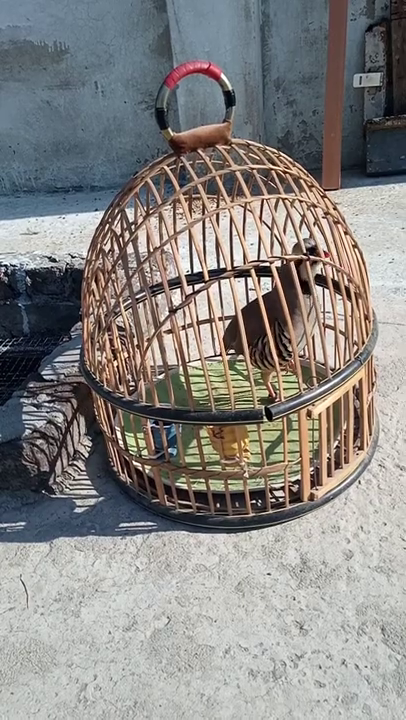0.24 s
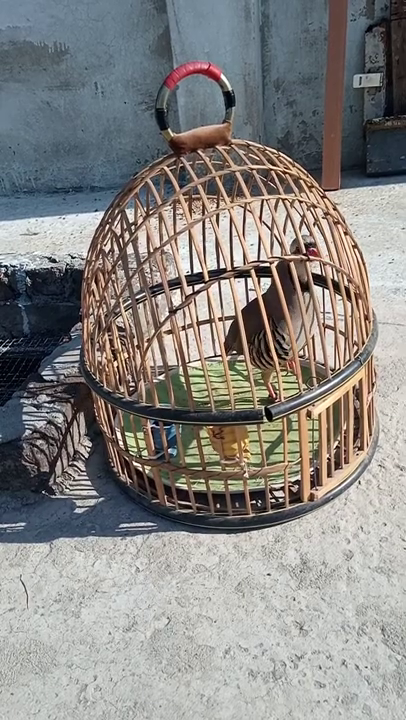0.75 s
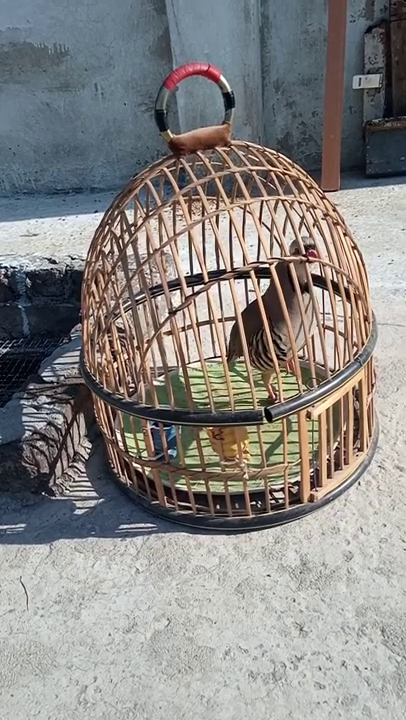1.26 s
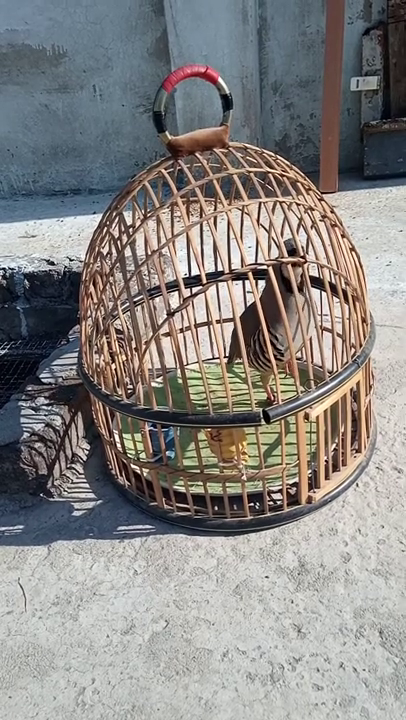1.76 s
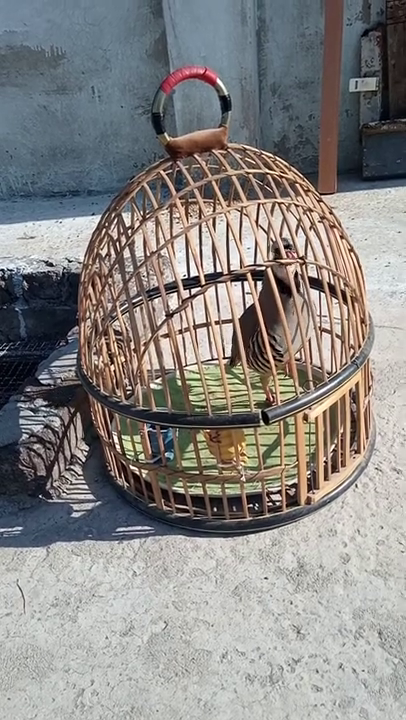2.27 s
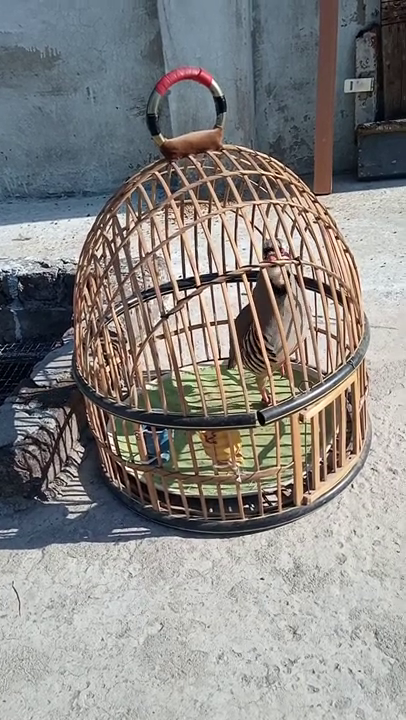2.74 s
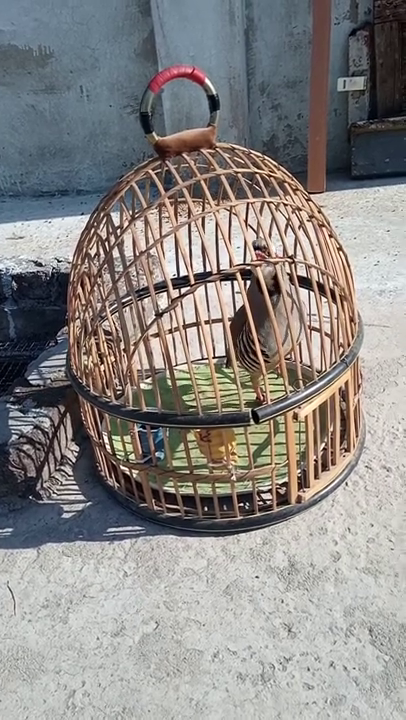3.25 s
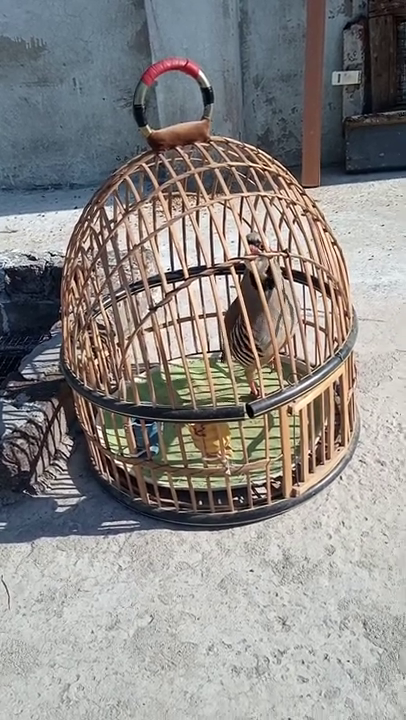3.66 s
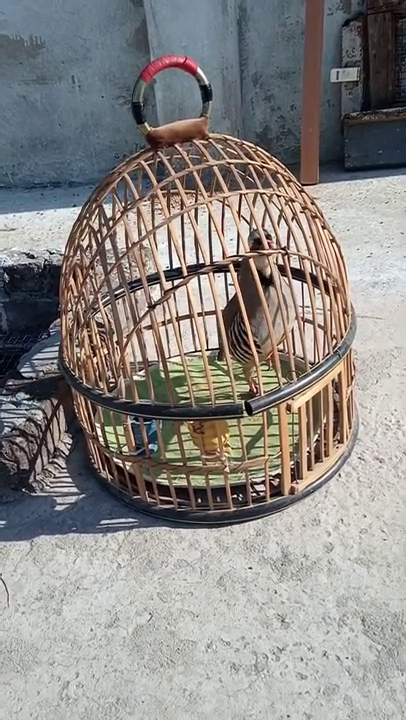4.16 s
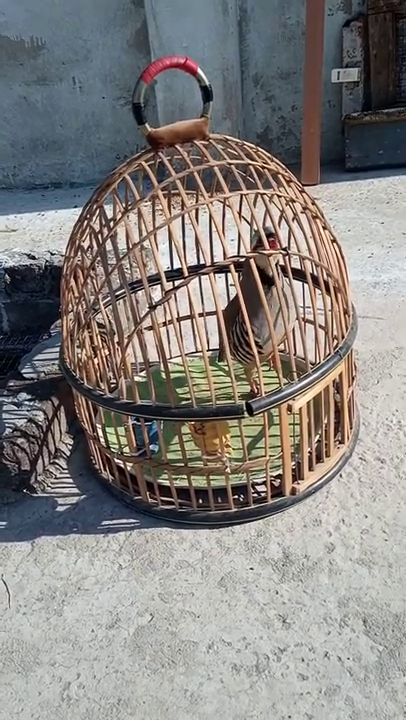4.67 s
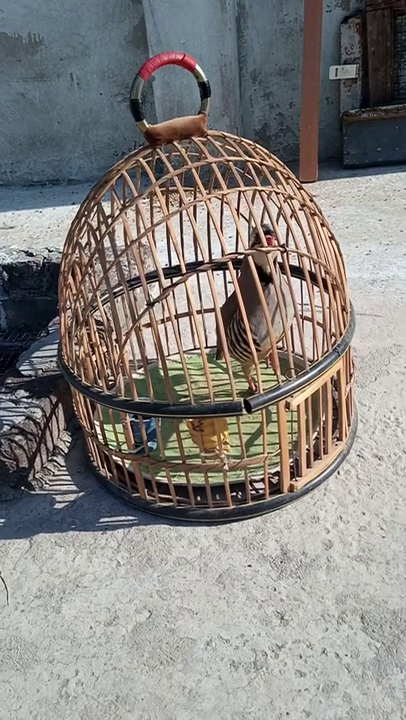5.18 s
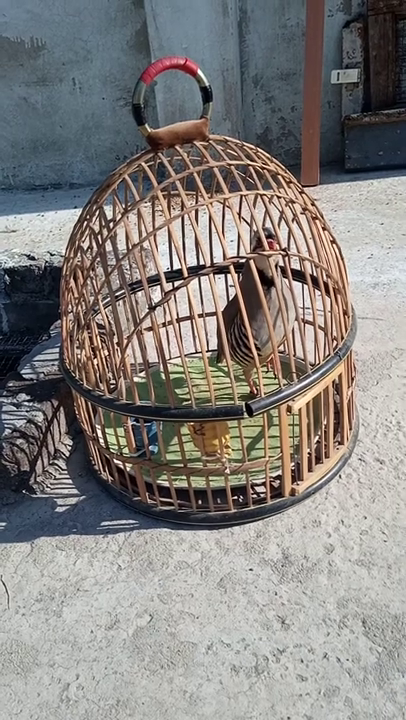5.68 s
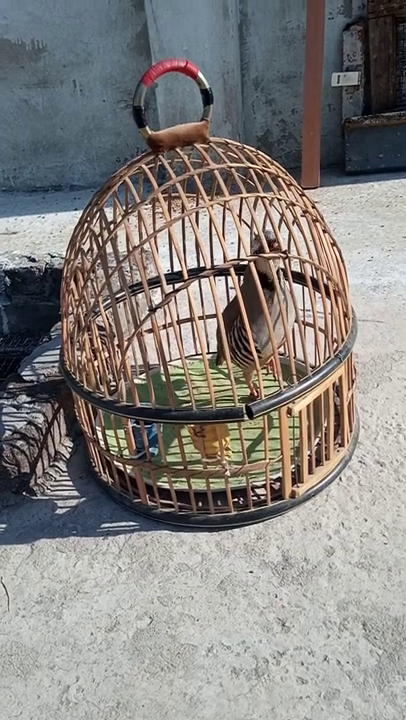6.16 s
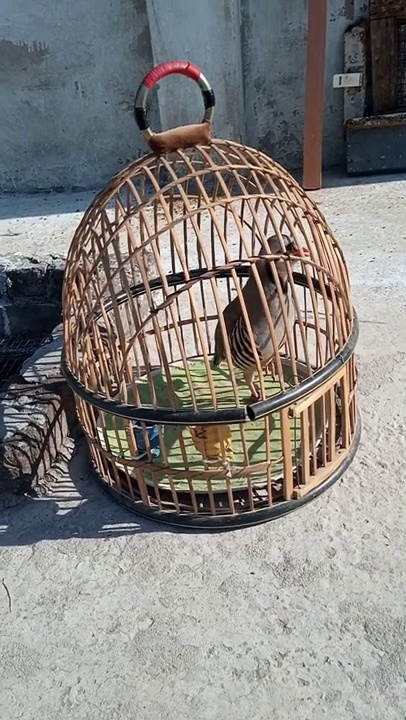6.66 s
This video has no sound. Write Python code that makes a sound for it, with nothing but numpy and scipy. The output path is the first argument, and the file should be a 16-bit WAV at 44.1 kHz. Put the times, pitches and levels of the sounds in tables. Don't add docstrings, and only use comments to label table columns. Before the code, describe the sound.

A caged partridge calls close to the microphone in a concrete yard with a short, hard reverberation. A low, throbbing rasp opens at 0 s, followed by a sharp cluck near 0.4. Another rasp at 0.5 leads to a cluck at 0.9; the pairs then tighten to roughly 0.42 seconds apart. From 1.4 to 4.9 s the rasps are shorter, louder and brighter, each a fluttering pulse around a woody, nasal resonance, answered by a brief arched cluck. After the cluck at 5.1 the rasps cease. Softer, rougher single clucks come near 5.4, 5.6, 5.85, 6.3, 6.6 and 6.9, increasingly dull and quiet. Faint traffic and distant machine whine lie beneath; a weak steady tone appears from 5.4 to 6.3, a claw knocks lightly near 6.57, and low wind gently rises.

```python
import sys
import numpy as np
from scipy import signal
from scipy.fft import rfft, irfft, next_fast_len
from scipy.io import wavfile
from scipy.ndimage import uniform_filter1d

SR = 44100
rng = np.random.default_rng(int(sys.argv[2]) if len(sys.argv) > 2 else 0)


def boost(x):
    u = np.asarray(x, float) / 20
    return 10 ** u


def to_wav(sig):
    pcm = np.clip(np.atleast_2d(sig), -1, 1) * 32767
    pcm = np.round(pcm).astype(np.int16)
    wavfile.write(sys.argv[1], SR, pcm.T)


N = 305169
TIME = np.arange(N) / SR

# (time [s], length [s], top pitch [Hz], peak level [dB], mouth brightness [dB])
CLUCKS = [(0.363, 0.044, 481, -16, -4), (0.877, 0.038, 477.7, -14, -3), (1.321, 0.039, 494.8, -14, -3.5),
          (1.756, 0.04, 501, -13.5, -2), (2.183, 0.043, 497.6, -13.5, -3.5),
          (2.605, 0.044, 504.2, -13, -2.5), (3.028, 0.046, 516.4, -14.5, -2),
          (3.436, 0.051, 504.6, -12, -4), (3.853, 0.046, 504, -13, -3), (4.271, 0.043, 496.3, -12.5, -2),
          (4.697, 0.045, 517.6, -14, -4), (5.114, 0.037, 456, -17, -7), (5.359, 0.03, 460, -16, -18.5),
          (5.586, 0.037, 463, -16, -13), (5.85, 0.032, 463, -23.5, -9.5),
          (6.256, 0.034, 456.7, -20.5, -14.5), (6.578, 0.037, 474, -23, -14), (6.901, 0.047, 524, -25, -27)]
PITCH_ARCH = [(0, .8, .84), (.18, .88, .92), (.32, 1.0, .97), (.5, 1.0, 1.0), (.7, .975, 1.01),
              (.86, .91, 1.0), (1, .74, .93)]
# (time [s], roughness [0-1])
ROUGHNESS = [(0.3, .22), (.9, .03), (1.3, .15), (4.8, .11), (5.1, .6), (5.36, .25), (5.85, .55),
             (6.25, .05), (6.58, .5), (6.9, .3)]
# (start [s], end [s], pulse rate [Hz], body level [dB], mouth brightness [dB])
RASPS = [(-.02, 0.179, 437.3, -29.5, -13), (0.503, 0.682, 432.3, -27, -9), (0.988, 1.12, 435.5, -25, -9),
         (1.428, 1.558, 442, -22, -4.5), (1.858, 1.979, 444, -21, -2.5), (2.276, 2.394, 450.2, -24, 2),
         (2.707, 2.814, 446.9, -21, 1), (3.128, 3.236, 446.7, -21, 2), (3.537, 3.64, 449.7, -22, 3),
         (3.957, 4.063, 446.8, -22.5, 1), (4.376, 4.48, 451.5, -21.5, 1.5), (4.807, 4.918, 445.8, -22, 0)]
# (first time [s], spacing [s], windpipe pitch [Hz], first level [dB], full level [dB])
TRAINS = [(.016, .0244, 1240, -28, -21), (.527, .0238, 1210, -25, -17.5), (1.028, .0245, 1290, -23, -13.5),
          (1.443, .0255, 1290, -19, -13), (1.876, .0242, 1310, -16, -11), (2.304, .0235, 1295, -12, -11),
          (2.729, .023, 1345, -15.5, -11), (3.152, .0213, 1330, -11.5, -10.5),
          (3.56, .0235, 1355, -11, -11), (3.98, .0205, 1345, -11, -11), (4.398, .0205, 1335, -11.5, -11),
          (4.835, .0235, 1335, -11.5, -11.5)]
# (time [s], pitch [Hz], level [dB])
UNDERTONE = [(0.0, 460, -45.5), (0.018, 429.3, -54), (0.114, 428.7, -49.5), (0.144, 406.5, -58),
             (0.158, 402, -55), (0.2, 377, -68.5)]
# (time [s], beak toward the microphone [0-1])
FACING = [
    (0, 0),
    (.9, 0.32),
    (1.3, 0.57),
    (1.7, 0.96),
    (5.2, 1),
    (5.7, 0.92),
    (6.2, 0),
    (6.92, 0),
]
# (centre [Hz], width [Hz], level [dB])
WINDPIPE = [(432, 1000, -22), (1066, 110, -29.5), (1167, 214, 2.5), (1338, 245, -1.5), (1463, 82, -22.5)]
# (centre [Hz], width [Hz], level [dB])
MOUTH_FRONT = [(2466, 470, -24.5), (3197, 450, -38), (3520, 570, -19.5), (3924, 350, -13), (4600, 120, -40),
               (5692, 370, -39), (6615, 570, -37), (7960, 750, -44.5)]
# (centre [Hz], width [Hz], level [dB])
MOUTH_SIDE = [(2472, 370, -22), (3453, 600, -24), (4320, 820, -24), (4660, 780, -25), (7200, 550, -52)]
# (frequency [Hz], 60 dB decay time [s])
WALL_T60 = [(300, 0.61), (1300, 0.38), (4000, 0.3), (8000, 0.31)]
# (frequency [Hz], level [dB])
ECHO_COLOUR = [(500, 1), (950, 4), (1340, -7), (1600, 5.5), (2450, -1.5), (3050, -13), (3950, -4),
               (7000, -3)]
# (frequency [Hz], level [dB per Hz])
TRAFFIC_SPECTRUM = [(20, -60.5), (35, -31), (55, -16.5), (105, 3.5), (180, -7.5), (300, -8.5), (600, -19),
                    (1200, -23), (2400, -27), (3500, -56), (8000, -61)]
# (time [s], level [dB])
TRAFFIC_DB = [(0, -61), (2.5, -62.5), (5, -63), (6, -62), (6.92, -61.5)]
# (time [s], level [dB])
AIR_DB = [(0, -94), (5, -91.5), (5.8, -84.5), (6.5, -87.5), (6.92, -86.5)]
# (centre [Hz], width [Hz], level [dB])
WHINE = [(2406, 45, -73), (3203, 25, -79)]
# (time [s], level [dB])
WHINE_DB = [(0, -14.5), (2.5, -21.5), (3.4, -2), (5.2, -6), (5.5, -4.5), (6.5, 0.5), (6.92, -18.5)]
# (centre [Hz], width [Hz], level [dB])
HUM = [(610, 22, -71)]
# (time [s], level [dB])
HUM_DB = [(0, -25), (5.1, -17), (5.3, -2), (6.15, 1.5), (6.35, -12), (6.92, -12)]
# (time [s], level [dB])
WIND_DB = [(0, -94), (4.8, -86), (5.3, -78.5), (6.92, -65)]
# (time [s], level [dB])
SHUFFLE_DB = [
    (6.52, -90),
    (6.545, -73),
    (6.56, -76),
    (6.572, -51.5),
    (6.6, -77),
    (6.625, -90),
]

WARM_UP_S, WIND_DOWN_S = 2.8, 5
LOW_LOSS_DB = 5
RASP_SWELL = .87
SURGE_DEPTH, SLACK_SURGE, SURGE_LEAD = .12, .004, .45
PIPE_DEPTH = .25
SWELL_SHARE = .7
THROB_WIDTH_S, WIDENING_S, THROB_POINT = .0075, .003, 1.6
TIME_JITTER_S, PITCH_JITTER_HZ, LEVEL_JITTER_DB, WIDTH_JITTER = .001, 30, 1.2, .18
SPLIT_SHARE = .25
FLICK_LAG_S, FLICK_WIDTH_S, FLICK_DB = .013, .0033, -.5
GLIDE_HZ, SLACK_GLIDE, FIRM_HZ = 30, .6, 1350
TAIL_DB, FIRST_WALL_S = -11.5, .008
HISS_DB = -71.5
TONE_HZ, TONE_DB, TONE_START_S, TONE_STOP_S = 875, -60.5, 5.4, 6.27
TONE_RISE_S, TONE_FALL = .25, 90
DUCK_DB, DUCK_S = -11, .06
CUTOFF_HZ = 8500


def curve(rows):
    s, *columns = np.transpose(rows)
    return [np.interp(TIME, s, c) for c in columns]


def at_hz(points, hz):
    table_hz, values = np.transpose(points)
    return np.interp(np.log(hz + 1), np.log(table_hz), values)


def rms_one(x):
    return x / np.sqrt(np.mean(x ** 2) + 1e-20)


def coloured(x, gain):
    size = next_fast_len(len(x))
    hz = np.arange(size // 2 + 1) * SR / size
    return irfft(rfft(x, size) * gain(hz), size)[:len(x)]


def peaks(modes, hz, skirt=0.94):
    return sum(boost(db) / (1 + ((hz - f) / (width / 2)) ** 2) ** skirt for f, width, db in modes)


def resonant_noise(modes):
    return rms_one(coloured(rng.standard_normal(N), lambda hz: peaks(modes, hz)))


def wobble(count, span):
    smooth = uniform_filter1d(rng.standard_normal(round(count)), round(span))
    return rms_one(uniform_filter1d(smooth, round(span)))


def add(out, s, x):
    i = round(s * SR)
    out[max(i, 0):i + len(x)] += x[max(-i, 0):N - i]


def throat(hz, s, bright_db, pipe_db=0):
    facing = np.clip(np.interp(s, *np.transpose(FACING)), 0, 1)
    front = peaks(MOUTH_FRONT, hz, skirt=1.364)
    side = peaks(MOUTH_SIDE, hz, skirt=1.76)
    mouth = facing * front + (1 - facing) * side
    pipe = peaks(WINDPIPE, hz, skirt=1.2)
    radiation = hz ** 2 / (hz ** 2 + 350 ** 2)
    return (boost(pipe_db) * pipe + boost(bright_db) * mouth) * radiation


def traffic():
    rumble = rms_one(coloured(rng.standard_normal(N), lambda hz: boost(at_hz(TRAFFIC_SPECTRUM, hz))))
    return boost(curve(TRAFFIC_DB)[0] + 1.5 + 3 * wobble(N, 2500)) * rumble


def air():
    dull = boost(HISS_DB) * resonant_noise([(1280, 320, 2), (2220, 370, -10.5)])
    thin = boost(curve(AIR_DB)[0]) * resonant_noise([(4960, 9900, 0)])
    return dull + thin


def far_machine():
    whine = sum(boost(db) * resonant_noise([(f, width, 0)]) for f, width, db in WHINE)
    hum = sum(boost(db) * resonant_noise([(f, width, 0)]) for f, width, db in HUM)
    return boost(curve(WHINE_DB)[0]) * whine + boost(curve(HUM_DB)[0]) * hum


def wind():
    return boost(curve(WIND_DB)[0]) * resonant_noise([(50, 25, 0)])


def rasps():
    out = np.zeros(N)
    t = np.arange(SR // 5) / SR
    for (start, end, pulse_hz, body_db, bright_db), train in zip(RASPS, TRAINS):
        first, spacing, pipe_hz, first_db, full_db = train
        breath = rng.standard_normal(len(t))
        sizes = boost(1.4 * wobble(len(t), 60))
        cycles = np.cumsum(pulse_hz * (1 + 0.13 * wobble(len(t), 90))) / SR
        pulses = np.diff(np.floor(cycles), prepend=0) * sizes
        flow = rms_one(pulses) + 0.89 * breath
        pipe = rms_one(coloured(flow, lambda hz: throat(hz, start, bright_db=-90)))
        mouth = rms_one(coloured(flow, lambda hz: throat(hz, start, bright_db=0, pipe_db=-90)))
        length = end - start
        pipe_effort = np.interp(t, [0, .004, .02, length - .008, length], [0, .6, .9, 1, 0])
        mouth_times = [.004, .012, .026, length - .012, length - .002]
        mouth_effort = np.interp(t, mouth_times, [0, .6, 1, 1, 0])
        beat = 2 * np.pi * (start + t - first) / spacing
        depth = SURGE_DEPTH + SLACK_SURGE * max(FIRM_HZ - pipe_hz, 0)
        surge = 1.21 * (1 + depth * np.cos(beat + 2 * np.pi * SURGE_LEAD))
        pipe_effort = pipe_effort * (1 + PIPE_DEPTH * np.cos(beat))
        ungrown = np.clip(1 - t / length / SWELL_SHARE, 0, 1)
        swell = boost(RASP_SWELL * (first_db - full_db) * (ungrown - 0.1844))
        body = boost(0.5) * pipe_effort * pipe
        hiss = boost(bright_db - 6.0) * mouth_effort * surge * mouth
        add(out, start, boost(body_db - 5.0) * swell * (body + hiss))
    return out


def undertone():
    hz, level_db = curve(UNDERTONE)
    phase = 2 * np.pi * np.cumsum(hz * (1 + 0.037 * wobble(N, 200))) / SR
    level = boost(level_db + 4.0 + 2.5 * wobble(N, 170)) * (TIME < UNDERTONE[-1][0])
    return level * (np.sin(phase) + 1.8 * np.sin(2 * phase))


def throb_rows():
    rows = []
    chance = rng.standard_normal((len(TRAINS), 9, 5))
    luck = rng.random((len(TRAINS), 9))
    for (first, spacing, hz, first_db, full_db), rasp, draws, lots in zip(TRAINS, RASPS, chance, luck):
        end = rasp[1]
        beats = np.arange(first, end - THROB_WIDTH_S, spacing)[:len(lots)]
        for s, (late, sharp, strong, wide, again), lot in zip(beats, draws, lots):
            along = (s - first) / (beats[-1] - first)
            db = first_db + (full_db - first_db) * min(along / SWELL_SHARE, 1)
            db = db - LEVEL_JITTER_DB * abs(strong)
            width = (THROB_WIDTH_S + WIDENING_S * along) * np.exp(WIDTH_JITTER * wide)
            rows.append((s + TIME_JITTER_S * late, db, hz + PITCH_JITTER_HZ * sharp, width))
            flick_s = s + FLICK_LAG_S
            if (lot < SPLIT_SHARE or along == 1) and flick_s < end:
                rows.append((flick_s, db + FLICK_DB, hz + PITCH_JITTER_HZ * again, FLICK_WIDTH_S))
    return rows


def throbs():
    out, flutter = np.zeros(N), wobble(N, 40)
    slides = rng.standard_normal((120, 2))
    for (s, peak_db, hz, width), (slide, turn) in zip(throb_rows(), slides):
        t = np.arange(-round(width * SR), round(width * SR)) / SR
        glide = GLIDE_HZ + SLACK_GLIDE * max(FIRM_HZ - hz, 0) + 30 * slide
        phase = 2 * np.pi * (hz * t - glide * t ** 2 / width + turn)
        phase = phase + 0.08 * np.interp(s + t, TIME, flutter)
        tone = np.sin(phase) + 0.023 * np.sin(2 * phase)
        bell = np.abs(np.cos(np.pi * t / width / 2)) ** THROB_POINT
        add(out, s - width, boost(peak_db - 0.1) * bell * tone)
    return out


def wall_echoes(x):
    t, edges, tail = np.arange(SR) / SR, 150 * 2. ** np.arange(7), 0
    for low, high in zip(edges, edges[1:]):
        octave = signal.butter(2, [low, high], "band", fs=SR, output="sos")
        band = signal.sosfilt(octave, rng.standard_normal(SR))
        tail = tail + band * boost(-60.0 * t / at_hz(WALL_T60, np.sqrt(low * high)))
    tail = coloured(tail, lambda hz: boost(at_hz(ECHO_COLOUR, hz)))
    tail = tail * np.clip((t - FIRST_WALL_S) / .012, 0, 1) * np.clip((.9 - t) / .2, 0, 1)
    gain = boost(TAIL_DB) * np.sqrt(2 * edges[-1] / SR) / np.sqrt(np.sum(tail ** 2))
    return signal.fftconvolve(x, gain * tail)[:N]


def clucks():
    out = np.zeros(N)
    share, loud_arch, soft_arch = np.transpose(PITCH_ARCH)
    u, order = np.linspace(0, 1, 2048), np.arange(1, 18)[:, None]
    for s, length, top_hz, peak_db, bright_db in CLUCKS:
        soft = s > WIND_DOWN_S
        rough = np.interp(s, *np.transpose(ROUGHNESS)) + .4 * np.exp(-((u - .2) / .1) ** 2)
        arch = np.interp(u, share, soft_arch if soft else loud_arch)
        arch = uniform_filter1d(arch, size=160, mode="nearest")
        arch = arch * (1 + 0.092 * rough * wobble(len(u), 120))
        effort = np.interp(u, [0, .3 if s < WARM_UP_S else .1, .84, 1], [0, .9, 1, 0])
        if soft:
            effort = effort * np.sin(np.pi * u)
        effort = effort * boost(np.clip(7 * rough * wobble(len(u), 130), -9, 2.5))
        along = np.arange(round(length * SR)) / (length * SR)
        pitch = top_hz * np.interp(along, u, arch)
        effort = np.interp(along, u, effort)
        start_phase = rng.uniform(0, 2 * np.pi, order.shape)
        phase = order * 2 * np.pi * np.cumsum(pitch) / SR + start_phase
        opening = np.sin(np.pi * along ** 0.81) ** (0.12 * order)
        onset = np.where(order == 3, 1, np.clip(along / .28, 0, 1) ** 1.5)
        if soft:
            onset = onset * boost(-6.0 * (order == 1) - 5.0 * (order > 11))
        onset = onset * boost(-LOW_LOSS_DB * (order < 3))
        filtered = throat(order * pitch, s, bright_db + 8.0) ** 1.01
        voice = effort * np.sum(onset * opening * filtered * np.sin(phase), axis=0)
        add(out, s, boost(peak_db) * voice / np.abs(voice).max())
    return out


def far_tone():
    rise = np.clip((TIME - TONE_START_S) / TONE_RISE_S, 0, 1) ** 2
    fall = boost(-TONE_FALL * np.maximum(TIME - TONE_STOP_S, 0))
    pitch = TONE_HZ + 1.5 * wobble(N, 3000)
    tone = np.sin(2 * np.pi * np.cumsum(pitch) / SR)
    return np.sqrt(2) * boost(TONE_DB + wobble(N, 2000)) * rise * fall * tone


def shuffle():
    grains = (rng.random(N) < 4000 / SR) * rng.standard_normal(N)
    scrape = rms_one(coloured(grains, lambda hz: peaks([(3900, 6200, 2), (6000, 3800, 0.46)], hz)))
    heard = (TIME > SHUFFLE_DB[0][0]) * (TIME < SHUFFLE_DB[-1][0])
    return scrape * boost(curve(SHUFFLE_DB)[0]) * heard


def scene():
    bird = rasps() + undertone() + throbs() + clucks()
    background = traffic() + air() + far_machine() + wind() + shuffle()
    loudness = uniform_filter1d(np.abs(bird), round(DUCK_S * SR))
    duck = boost(DUCK_DB * loudness / loudness.max())
    return (bird + wall_echoes(bird) + far_tone() + duck * background)[None]


def roll_off(x):
    return signal.sosfilt(signal.butter(12, 8270, fs=SR, output="sos"), x)


def record(dry):
    rounded = .5 * np.tanh(dry / .5)
    low_pass = signal.cheby2(10, 50, CUTOFF_HZ, fs=SR, output="sos")
    return roll_off(signal.sosfilt(low_pass, rounded))


dry = scene()
out = record(dry)
to_wav(out)
```